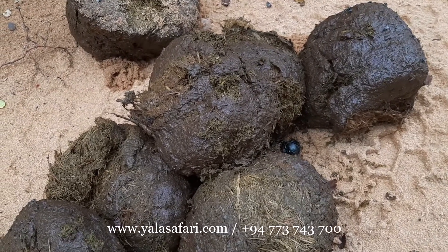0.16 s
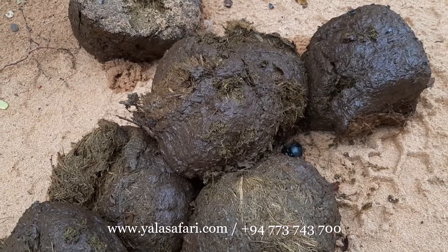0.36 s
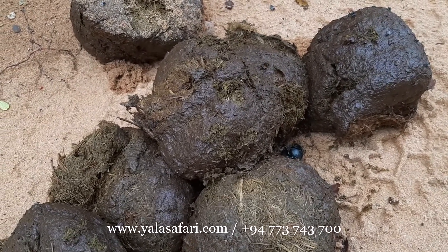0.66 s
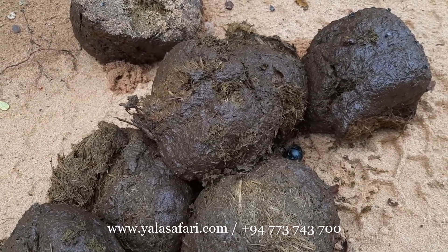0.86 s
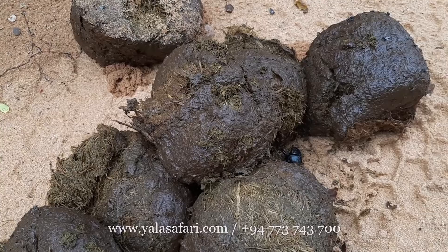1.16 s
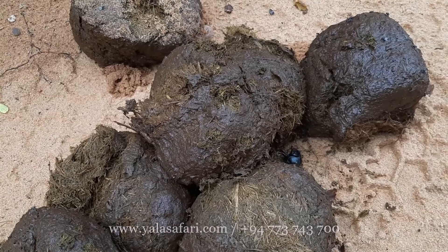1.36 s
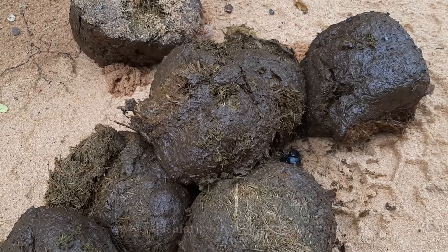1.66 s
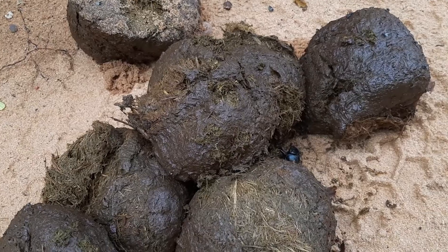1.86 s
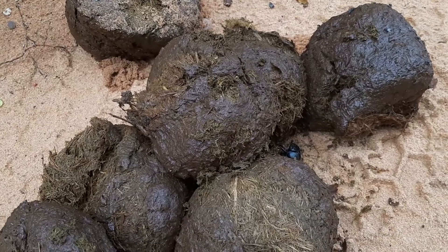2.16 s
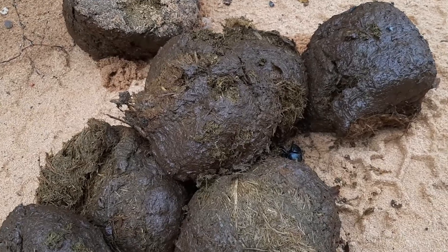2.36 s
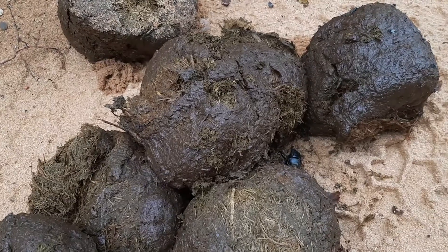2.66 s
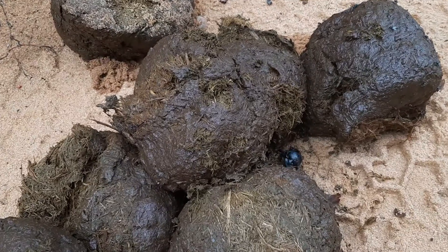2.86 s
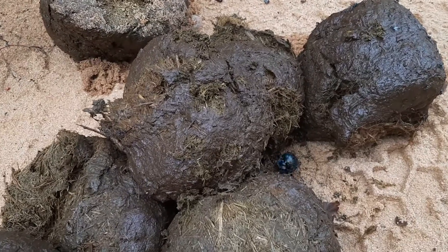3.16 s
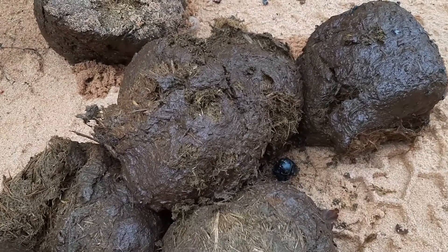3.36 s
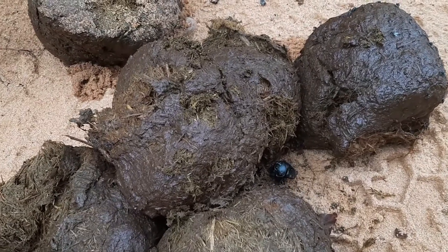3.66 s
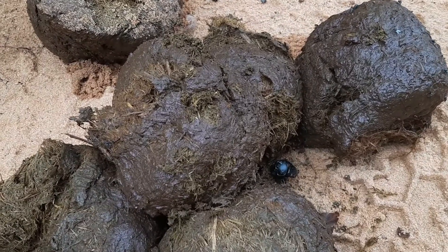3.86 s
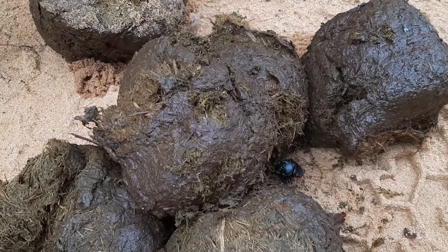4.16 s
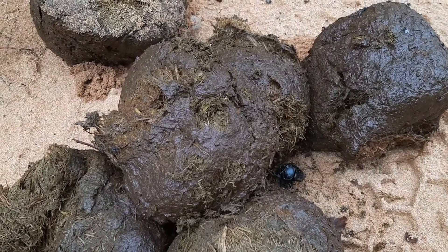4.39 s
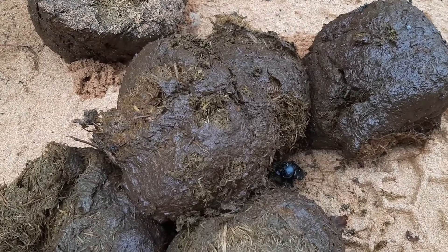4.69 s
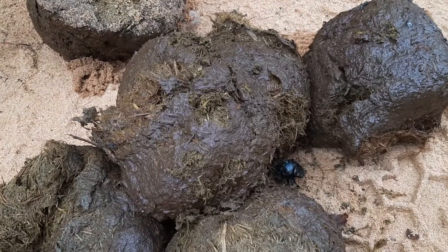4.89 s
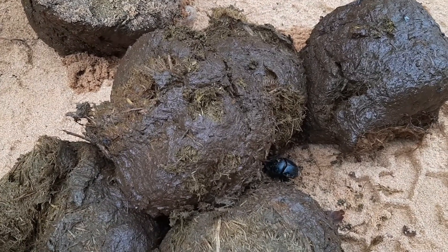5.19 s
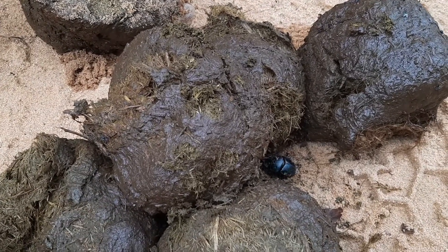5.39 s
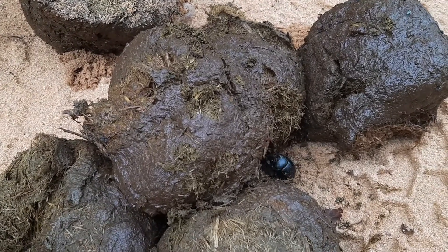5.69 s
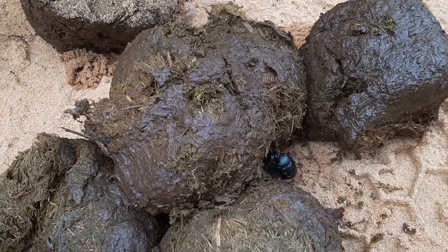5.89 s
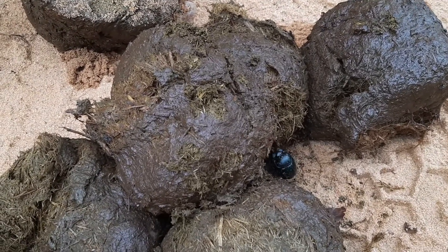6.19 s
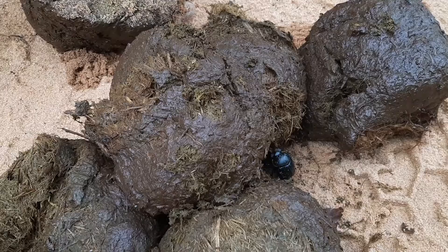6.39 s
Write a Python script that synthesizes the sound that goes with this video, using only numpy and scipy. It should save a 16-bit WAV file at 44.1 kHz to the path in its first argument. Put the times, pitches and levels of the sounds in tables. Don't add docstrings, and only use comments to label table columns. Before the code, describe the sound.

Countless far birds form a steady, high shimmering band in quiet open air, mostly to the right. Nearer birds chirp, chatter and sweep downward, blurred by foliage. Midway, very close hand noise on the camera rumbles, creaks and crackles over a two-voiced bird call and sharp high notes, then stops. The end brings beaded, wavering whistles and a loud shrill trill, over faint hiss.

```python
import sys
import numpy as np
from scipy import signal
from scipy.fft import rfft, irfft, next_fast_len
from scipy.io import wavfile
from scipy.ndimage import uniform_filter1d

SR = 44100
rng = np.random.default_rng(int(sys.argv[2]) if len(sys.argv) > 2 else 0)


def generate_wav(signal):
    frames = np.transpose(np.atleast_2d(signal))
    scaled = np.clip(frames, -1, 1) * 32767
    pcm = np.round(scaled).astype(np.int16)
    wavfile.write(sys.argv[1], SR, pcm)


def volts(x):
    e = np.asarray(x, float) / 20
    return 10 ** e


N = 288414
PORT_LAG = -20


def unit(x):
    return x / np.sqrt(np.mean(x ** 2))


def ports(left_db, right_db):
    return volts(np.array([[left_db], [right_db]], float))


def walk(rate):
    hold = int(SR / rate)
    steps = np.repeat(rng.standard_normal(N // hold + 1), hold)
    return 1.45 * uniform_filter1d(uniform_filter1d(steps, hold), hold)[:N]


def track(rows):
    s, *columns = np.transpose(rows)
    return [np.interp(np.arange(N) / SR, s, column) for column in columns]


def bands(spectrum, step, swell_db, flicker_db, likeness, lag):
    hz, db = np.transpose(spectrum)
    size = next_fast_len(N)
    f = np.fft.rfftfreq(size, 1 / SR) + 1
    octave = np.log2(f)
    gain = volts(np.interp(np.log(f), np.log(hz), db, left=-80, right=-80))
    common, left, right = (rfft(rng.standard_normal(size)) for _ in range(3))
    share = np.clip(likeness(f), 0, 1)
    delay = np.array([np.exp(-2j * np.pi * f * lag / SR), np.ones(len(f))])
    pair = np.sqrt(share) * common * delay + np.sqrt(1 - share) * np.array([left, right])
    out, swell = 0, swell_db * walk(2.25)
    for centre in np.arange(octave[f > hz[0]][0], np.log2(hz[-1]) + step, step):
        shape = np.cos(np.pi / 2 * np.clip((octave - centre) / step, -1, 1)) ** 2
        band = irfft(pair * gain * shape, size)[:, :N]
        out = out + volts(swell + flicker_db * walk(12.0)) * band
    return unit(out)


def add(out, rows, partials, rough):
    s, hz, db = np.transpose(rows)
    i = np.arange(max(int(s[0] * SR), 0), min(int(s[-1] * SR), N))
    waver = uniform_filter1d(rng.standard_normal(len(i)), size=100) * 10
    phase = 2 * np.pi * np.cumsum(np.interp(i / SR, s, hz) * (1 + rough * waver)) / SR
    fade_s = 0.00026
    edge = np.minimum(np.minimum(i - i[0], i[-1] - i) / (fade_s * SR), 1)
    voice = sum(volts(d) * np.sin(multiple * phase) for multiple, d in partials)
    out[i] += np.sqrt(2) * edge * volts(np.interp(i / SR, s, db)) * voice


def notes(table, partials, rough):
    out, u = np.zeros(N), np.linspace(0, 1, 9)
    for s, length, first, middle, last, db in table:
        bend = first * (1 - u) * (1 - 2 * u) + 4 * middle * u * (1 - u) + last * u * (2 * u - 1)
        swell_db = db - 9.0 * (2 * u - 1) ** 2
        add(out, np.c_[s + length * u, bend, swell_db], partials, rough)
    return out


def glides(table, bend):
    s, length, first, last, db = np.transpose(table)
    return np.c_[s, length, first, first + bend * (last - first), last, db]


def leaves(x, pan_db, wet_db, t60):
    t = np.arange(int(.5 * SR)) / SR
    tail = rng.standard_normal((2, len(t))) * volts(-60 * t / t60)
    tail *= volts(wet_db) / np.sqrt(np.sum(tail ** 2, axis=1, keepdims=True))
    scattered = signal.fftconvolve(x[None], tail, axes=1)[:, :N]
    direct = np.array([np.roll(x, PORT_LAG), x])
    return (scattered + direct) * ports(pan_db, 0)


def ring(x, modes):
    return sum(volts(db) * signal.lfilter(*signal.iirpeak(hz, hz / width, SR), x) for hz, width, db in modes)


def bursts(table, t60):
    kicks = np.zeros(N)
    kicks[(table[:, 0] * SR).astype(int)] = volts(table[:, 1])
    decay = volts(-60 / (t60 * SR))
    return signal.lfilter([1], [1, -decay], kicks) * rng.standard_normal((2, N))


# f/Hz, density/dB [per Hz]
HISS_COLOUR = [(6000, -34), (7600, -32), (8800, -21), (9800, -8), (11300, -3), (13500, 0), (15700, 0)]


def hiss():
    return bands(HISS_COLOUR, 1.4, .3, .3, lambda f: 0 * f, 0) * volts(-77.5)


# f/Hz, density/dB [per Hz]
AIR_COLOUR = [(22, -62), (45, -2), (99, -0.5), (228, -8), (350, -18), (808, -26.5), (1860, -25.5),
              (4000, -36), (7000, -49)]


def air():
    breeze = bands(AIR_COLOUR, 0.8, 1.0, 2.2, lambda f: 1 / (1 + (f / 500) ** 2), 0)
    return breeze * volts(-68.5) * ports(-1, 1)


# t/s, level/dB
CHORUS_LEVEL = [(0.0, -60.5), (0.4, -57.5), (0.8, -61), (0.92, -54.5), (1.05, -55.5), (2.18, -60.5),
                (2.42, -54.5), (2.82, -54.5), (3.37, -59.5), (3.62, -49.5), (4.02, -62.5), (4.44, -56.5),
                (5.76, -58.5), (6.06, -54), (6.54, -56)]
# f/Hz, density/dB [per Hz]
CHORUS_COLOUR = [(2060, -56), (3500, -42), (4060, -22.5), (4800, -4), (5340, 0.5), (5730, -1),
                 (6580, -21.5), (6780, -25.5), (7720, -77), (8500, -42)]


def chorus():
    band = bands(CHORUS_COLOUR, 0.1437, 0.91, 1.45, lambda f: .1 + 0 * f, PORT_LAG)
    return band * volts(track(CHORUS_LEVEL)[0]) * ports(-2.5, 5)


# t/s, level/dB
BABBLE_LEVEL = [(0.0, -65.5), (1.29, -77.5), (2.37, -64), (2.64, -51.5), (2.95, -68), (3.7, -71.5),
                (4.35, -76), (4.6, -70.5), (5.0, -69), (5.4, -63), (6.54, -71)]


def babble(count=350):
    when, length, pitch, rise, fall, size = rng.random((count, 6)).T
    start = when * (N / SR - .1)
    hz = 2300 * 1.55 ** pitch
    first, last = hz * (1 - .3 * rise), hz * (1.1 - .3 * fall)
    crowd = notes(np.c_[start, .02 + .03 * length, first, hz, last, -6 * size], [(1, 0)], .04)
    return unit(leaves(crowd, -10, 5, .16)) * volts(track(BABBLE_LEVEL)[0] - 1.5)


# t/s, f/Hz, level/dB
CRICKET_TONE = [
    (1.66, 2330, -77),
    (1.8, 2280, -75),
    (2.15, 2305, -67),
    (2.37, 2270, -68),
    (2.98, 2345, -61),
    (3.14, 2328, -64),
    (3.46, 2263, -56),
    (3.65, 2262, -52),
    (3.69, 2290, -68),
    (4.36, 2295, -77),
]


def cricket():
    out = np.zeros(N)
    add(out, CRICKET_TONE, [(0.99, 0.023)], .0015)
    return leaves(out * volts(3.5 + .8 * walk(25.)), -15, -12, .1)


SWEEPS = {6600: [(.242, -60.5), (.439, -61.5), (.761, -61.5), (1.09, -62.5), (1.459, -60.5), (1.81, -59),
          (2.16, -58.5), (2.585, -57), (2.959, -56.5), (3.358, -59), (3.71, -62), (4.099, -63.5),
          (4.458, -60), (4.82, -58)], 7090: [(.566, -62), (.871, -66), (1.25, -66), (1.59, -62),
          (1.959, -64), (2.294, -60.5), (4.331, -60), (4.662, -63.5)]}
# t/s, pitch [share of top], level/dB
SWEEP_SHAPE = [
    (0, 1.0, -8),
    (.012, 1.0, 0),
    (.045, .97, 0),
    (.085, .8, 2),
    (.15, .56, -6),
    (.165, .52, -20),
]


def warblers():
    out, (s, share, shape_db) = np.zeros(N), np.transpose(SWEEP_SHAPE)
    for top_hz, calls in SWEEPS.items():
        for start, db in calls:
            add(out, np.c_[start + s, top_hz * share, db + shape_db], [(1, 0)], .016)
    return leaves(out * volts(.5 + 2.0 * walk(90.)), -9.5, 3, 0.2)


# t/s, length [s], first f/Hz, last f/Hz, level/dB
CHIRPS = [(0, 0.013, 2720, 2600, -48.5), (1.083, 0.0035, 1200, 2470, -61), (.12, 0.064, 4400, 4520, -53.5),
          (.15, 0.027, 1870, 2290, -58.5), (.29, 0.04, 2390, 2090, -64), (.335, 0.053, 2100, 1996, -58),
          (.345, 0.039, 2290, 2870, -58), (.443, 0.029, 1870, 2390, -57.5), (.51, 0.027, 2970, 3050, -53),
          (.665, 0.017, 1370, 1620, -67), (.688, 0.04, 1950, 2620, -60), (.69, .075, 2023, 2036, -66),
          (.755, 0.027, 2020, 2590, -59), (1.155, 0.015, 1840, 1920, -68), (1.2, 0.04, 1990, 2714, -59.5),
          (1.33, .045, 2256, 1994, -64.5), (1.45, 0.023, 1990, 2385, -55.5),
          (1.478, .016, 2750, 2120, -56.5), (1.515, 0.02, 1925, 2505, -55.5),
          (1.54, 0.012, 2330, 2500, -63), (1.58, 0.091, 2340, 2195, -66.5),
          (4.56, 0.018, 1930, 2380, -58.5), (4.7, 0.031, 1900, 2270, -62.5),
          (4.69, 0.19, 3400, 3420, -60.5), (4.795, 0.03, 2940, 3430, -52),
          (5.475, 0.023, 2590, 2700, -53.5), (5.54, 0.036, 2590, 3530, -53),
          (6.52, 0.033, 4210, 4430, -43.5)]
# t/s, length [s], first f/Hz, top f/Hz, last f/Hz, level/dB
ARCH = [
    (1.357, 0.023, 2010, 2680, 2200, -53.5),
]
# t/s, length [s], first f/Hz, last f/Hz, level/dB
HIGH_NOTES = [
    (.11, 0.096, 8960, 9260, -75.5),
    (5.57, 0.069, 8350, 6900, -64.5),
    (1.882, 0.046, 8420, 7070, -50.5),
    (2.974, 0.011, 5300, 7530, -48),
    (2.993, 0.014, 5550, 7500, -51),
    (3.012, 0.036, 8350, 6980, -46.5),
    (3.097, .022, 5130, 8400, -46.5),
    (3.13, 0.032, 7720, 6800, -47),
    (4.5, 0.043, 8200, 6960, -56),
]
# t/s, length [s], first f/Hz, last f/Hz, level/dB
HOARSE = [
    (.862, .03, 5200, 3700, -57),
    (.866, .05, 5000, 5800, -52),
    (.9, .05, 5200, 5500, -55),
    (.855, .04, 8100, 7330, -74),
    (.89, .06, 6300, 7100, -63),
    (5.03, .06, 5100, 4300, -61),
]
# t/s, length [s], first f/Hz, last f/Hz, level/dB
FALLS = [
    (.265, 0.18, 2013, 1400, -66),
    (.42, 0.078, 1654, 1525, -70),
    (4.49, 0.25, 2060, 1342, -68),
    (5.985, 0.24, 2375, 1400, -62.5),
]
# t/s, f/Hz, level/dB
TWIN = [
    (2.401, 2140, -72),
    (2.449, 2980, -49.5),
    (2.479, 3220, -50.5),
    (2.515, 3249, -51.5),
    (2.698, 2955, -56),
    (2.74, 2700, -76),
]
# t/s, length [s], top f/Hz, level/dB
CHATTER = [
    (2.795, 0.025, 2966, -50),
    (2.866, 0.012, 3180, -55),
    (2.886, 0.017, 2810, -51.5),
    (2.962, 0.021, 2980, -57.5),
    (2.98, 0.019, 2690, -57),
    (3.045, 0.021, 3010, -66.5),
    (3.064, 0.017, 2474, -62.5),
]
# pitch [share of upper voice], level/dB
TWIN_VOICES = [(1.0, 4), (.912, 3), (.82, -13), (1.1, -22)]


def songbirds():
    low = leaves(notes(np.r_[glides(CHIRPS, .7), ARCH], [(1, 0)], .007), -13, -3, .22)
    high = leaves(notes(glides(HIGH_NOTES, .8), [(1, 0)], .006), -2, 1, .25)
    hoarse = leaves(notes(glides(HOARSE, .7), [(1, 0)], .05), -6, 8, .2)
    falls = notes(glides(FALLS, .65), [(1, 0)], .008)
    falls = leaves(falls * volts(2.5 * walk(60.)), -13, 0, .3)
    s, length, top_hz, db = np.transpose(CHATTER)
    twin = notes(np.c_[s, length, .85 * top_hz, top_hz, .98 * top_hz, db], TWIN_VOICES, 0.0085)
    add(twin, TWIN, TWIN_VOICES, .004)
    twin = leaves(twin * volts(6.5 + 1.2 * walk(50.)), -16.5, -4, 0.13)
    return low + high + hoarse + falls + twin


# t/s, length [s], first f/Hz, last f/Hz, level/dB
WHISTLE = [(5.138, 0.092, 4480, 3900, -42), (5.22, 0.052, 4020, 3850, -53), (5.28, 0.082, 3920, 3780, -46),
           (5.355, 0.056, 3820, 3806, -43), (5.445, 0.054, 3870, 3804, -43.5),
           (5.505, 0.027, 3730, 3750, -38.5), (5.545, .025, 3750, 3730, -49),
           (5.6, 0.034, 4060, 3910, -43.5), (5.638, 0.046, 3960, 3830, -40), (5.68, 0.072, 3897, 3760, -47),
           (5.76, 0.1, 3970, 3820, -60), (6.095, 0.035, 3780, 3700, -48), (6.125, 0.052, 3730, 3610, -39.5),
           (6.188, 0.033, 3710, 3580, -44), (6.225, 0.03, 3500, 3330, -49),
           (6.274, 0.024, 3630, 3460, -40.5), (6.292, 0.015, 3520, 3410, -42),
           (6.32, 0.047, 3540, 3580, -55), (6.365, 0.089, 3400, 3450, -45.5),
           (6.422, 0.036, 3655, 3674, -40), (6.475, 0.02, 3700, 3630, -41.5),
           (6.508, 0.027, 3600, 3620, -63)]
# t/s, f/Hz, level/dB
WHISTLE_LEAD = [
    (5.0, 5230, -85),
    (5.046, 4980, -59),
    (5.1, 4590, -69),
    (5.14, 4300, -85),
]
# t/s, f/Hz, level/dB
SHRILL = [
    [(5.76, 4680, -65), (5.775, 4710, -51), (5.796, 4900, -40), (5.812, 5140, -44), (5.83, 5185, -37),
     (5.848, 5180, -30), (5.88, 5130, -39), (5.92, 5130, -61)],
    [(5.932, 4900, -58), (5.95, 5050, -38.5), (5.965, 5073, -40), (5.985, 5080, -64)],
    [(5.985, 5100, -56), (5.998, 4990, -37), (6.01, 4910, -40.5), (6.022, 5050, -45), (6.038, 5020, -36),
     (6.07, 4870, -58)],
]
# multiple [of pitch], level/dB
SHRILL_SIDES = [(1.252, -15), (1.5, -35), (2.25, -29.5), (2.5, -30)]


def whistlers():
    far, near = notes(glides(WHISTLE, .7), [(1, -0.5), (2, -25)], .008), np.zeros(N)
    add(far, WHISTLE_LEAD, [(1, 9), (2, 1.0)], .03)
    for pulse in SHRILL:
        add(near, pulse, [(1, 0), (2, -18.0), (3, -27.5)], .0045)
    add(near, SHRILL[0], [(.972, -5), (.94, -11), (1.95, -30), (2.93, -33)], .012)
    add(near, [(5.915, 5010, -42), (5.97, 5070, -36.5), (6.06, 5090, -56)], SHRILL_SIDES, .005)
    drops = [(5.865, 0.059, 5030, 4870, 4300, -56.5), (6.01, 0.059, 5050, 4780, 4750, -50.5)]
    near += notes(drops, [(1, 4.5), (2, -13.5), (3, -25)], 0.038)
    near = leaves(near * volts(.5 + 1.5 * walk(130.)), -8, -4, .22)
    return leaves(far * volts(-3 + 2.5 * walk(90.)), -9.5, -7, 0.25) + near


# t/s, hold [s], weight level/dB, slide level/dB
GRIP = [(0.36, 0.051, -71, -68.5), (0.861, 0.026, -70, -60), (1.093, 0.064, -61.5, -59),
        (2.011, 0.34, -54.5, -53), (2.282, 0.077, -58, -48), (2.382, 0.087, -47.5, -52),
        (2.616, 0.089, -52.5, -50.5), (2.837, 0.13, -56, -44), (2.98, 0.021, -47, -46.5),
        (3.049, 0.12, -52, -47), (3.189, 0.26, -48, -46.5), (3.582, 0.074, -54, -47),
        (3.683, 0.071, -51, -75), (3.981, 0.034, -53.5, -50.5), (5.829, 0.14, -71, -58)]


def pushes(part, rest_db, press_db_s, let_go_db_s):
    t = np.arange(0, N, 64) / SR
    power = volts(rest_db) ** 2
    for s, hold, *db in GRIP:
        before, after = np.clip(s - t, 0, 1), np.clip(t - s - hold, 0, 2)
        power = power + volts(db[part] - press_db_s * before - let_go_db_s * after) ** 2
    return np.interp(np.arange(N) / SR, t, 10 * np.log10(power))


# f/Hz, width [Hz], level/dB
HEAVE = [(65.7, 16.3, -4.5), (50, 22, -33), (78, 43, -14)]
# f/Hz, width [Hz], level/dB
RUB = [(117.6, 41, 3), (158.3, 27.6, 0.5), (210.6, 93, -9.5)]
# f/Hz, width [Hz], level/dB
CREAK = [(442, 264, 2.5), (476, 92, -3), (581, 30, -2), (760, 84, -10), (920, 93, -1.5), (1260, 100, -7),
         (1478, 54, -1.5)]
# t/s, peak level/dB, top level/dB [re peak]
SLIPS = [(2.278, -53.5, -28), (2.314, -48, -15), (2.406, -61, -3), (2.432, -53, -3), (2.617, -53.5, 0),
         (2.831, -36.5, -31), (2.91, -45, -5), (2.93, -39.5, -24), (3.044, -47, -7), (3.094, -45.5, -10),
         (3.136, -75, -14), (3.161, -71, -15), (3.185, -42.5, -10), (3.222, -49.5, -1), (3.254, -44, -8),
         (3.32, -41.5, -8), (3.368, -42, -3.5), (3.407, -42.5, -3.5), (3.584, -55, 6.5), (3.621, -45, -2.5),
         (3.973, -50, -7), (5.733, -62, -23)]
# t/s, peak level/dB
TICKS = [(0.4105, -68), (1.468, -61.5), (1.8705, -69), (3.098, -54), (3.186, -60), (3.3184, -61),
         (3.369, -60), (3.584, -58), (3.621, -63), (3.973, -70), (4.2804, -70)]


def hand():
    weight_db = pushes(0, -83, 916, 64.5)
    slide_db = pushes(1, -100.5, 1497, 196)
    creak_db = -54.5 + 1.82 * (slide_db + 45.5)
    opposite = np.array([[1], [-1]])
    shell = 0
    for modes, db, side_db in ((HEAVE, weight_db, -17), (RUB, slide_db, -15), (CREAK, creak_db, -13)):
        push = rng.standard_normal((2, N)) * volts(1.2 * walk(40.))
        mid, side = ring(ring(push, modes), modes)
        shell = shell + volts(db) * (unit(mid) + volts(side_db) * unit(side) * opposite)

    slips = np.array(SLIPS)
    scrape = bursts(slips[:, :2], 0.16)
    scrape = scrape[0] + .35 * scrape[1] * opposite
    low = ring(scrape, [(793, 320, 5.2)])
    thumb = ring(ring(scrape, [(1440, 1750, 1)]), [(1440, 1750, 0.011)])
    low = low + thumb * ports(-7, 3)
    crackle = bursts(np.c_[slips[:, 0], slips[:, 1] + slips[:, 2]], .06)
    top = ring(crackle, [(2600, 1500, 6), (3800, 1400, 5)])
    top = signal.sosfilt(signal.butter(4, 4800, fs=SR, output="sos"), top)

    high_pass = signal.butter(4, 8600, "high", fs=SR, output="sos")
    rustle = signal.sosfilt(high_pass, rng.standard_normal((2, N)))
    rustle = rustle * uniform_filter1d(volts(-44.5 + 0.57 * slide_db), size=5000)
    ticks = ring(ring(bursts(np.array(TICKS), 0.028), [(11100, 15000, 2.4)]), [(10700, 20000, 2.4)])
    return shell * ports(-1.1, 1.1) + low * ports(-1.5, 1.5) + top * ports(-5, 5) + rustle + ticks


def scene():
    background = hiss() + air() + chorus() + babble()
    return background + cricket() + warblers() + songbirds() + whistlers() + hand()


def roll_off(x):
    return signal.sosfilt(signal.butter(12, 15790, fs=SR, output="sos"), x)


def record(dry):
    low_pass = signal.ellip(8, .2, 70, 15750, fs=SR, output="sos")
    mix = signal.sosfilt(low_pass, dry)
    return roll_off(mix)


dry = scene()
out = record(dry)
generate_wav(out)
```